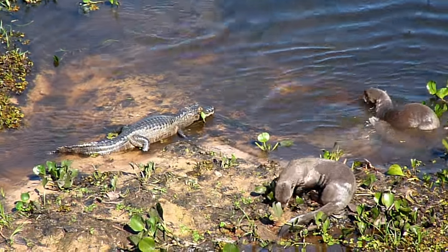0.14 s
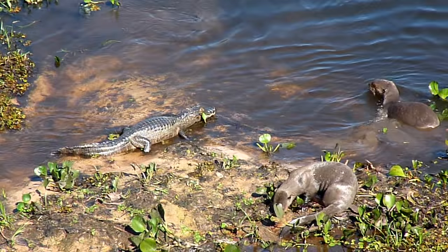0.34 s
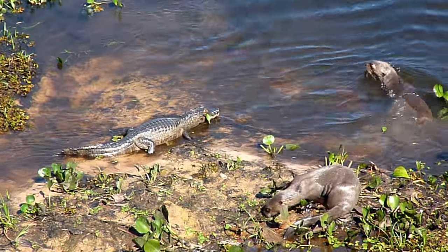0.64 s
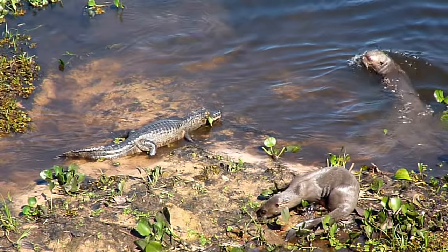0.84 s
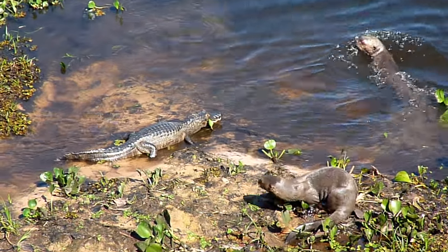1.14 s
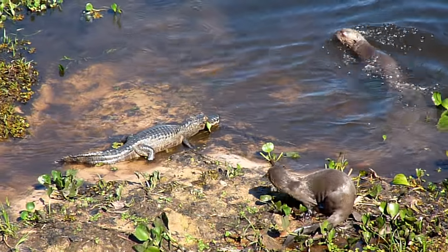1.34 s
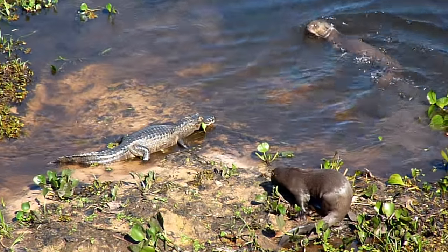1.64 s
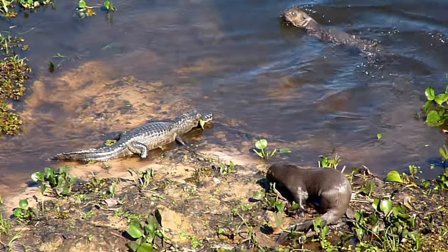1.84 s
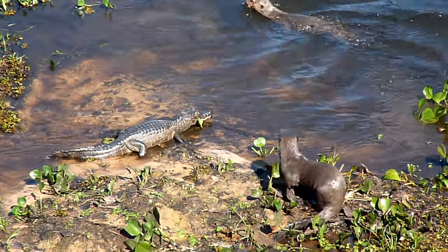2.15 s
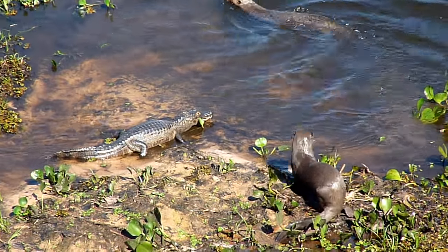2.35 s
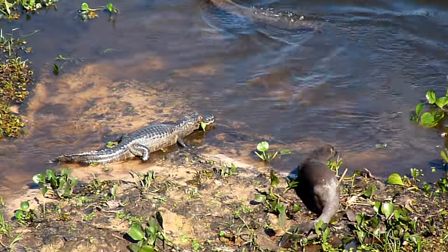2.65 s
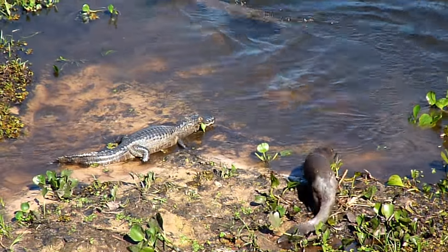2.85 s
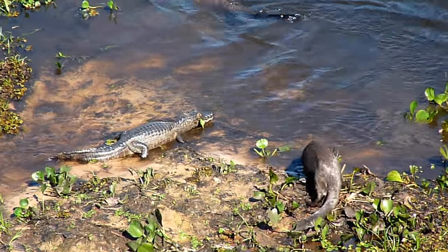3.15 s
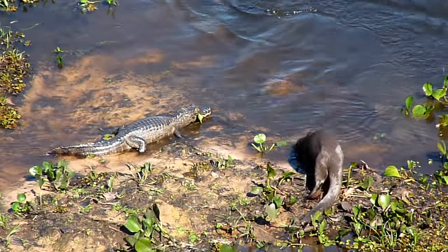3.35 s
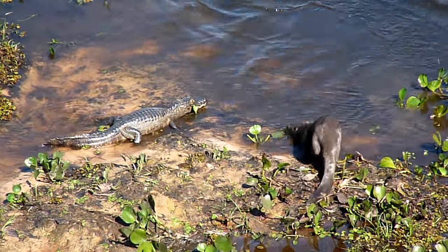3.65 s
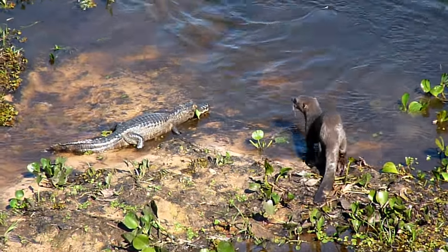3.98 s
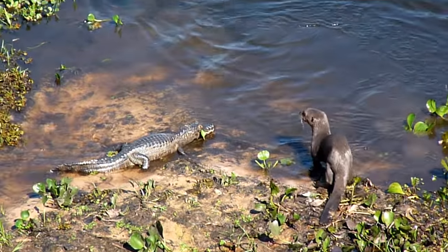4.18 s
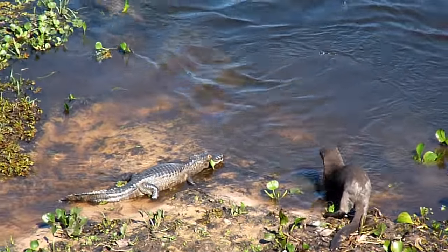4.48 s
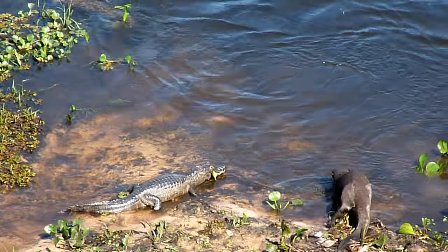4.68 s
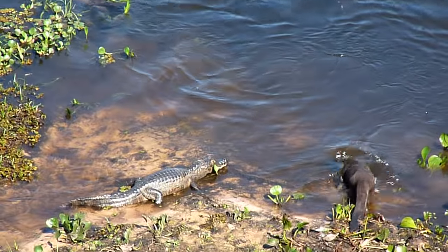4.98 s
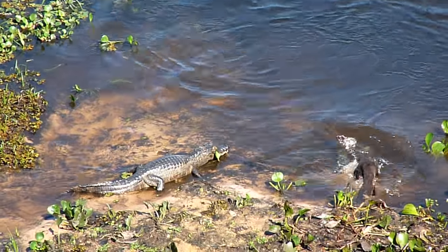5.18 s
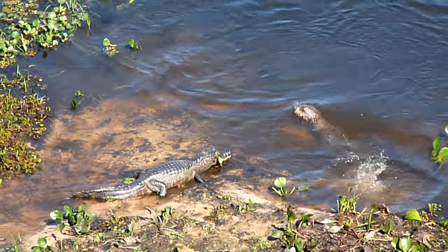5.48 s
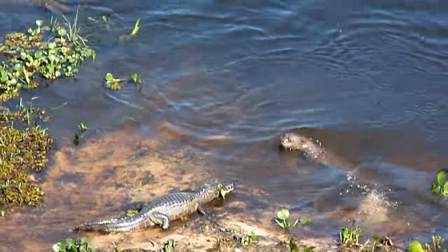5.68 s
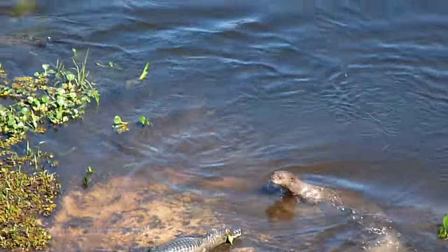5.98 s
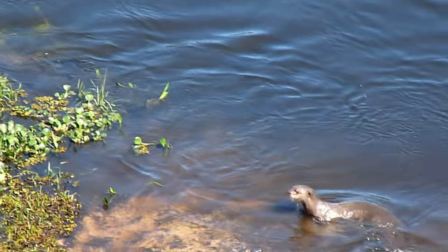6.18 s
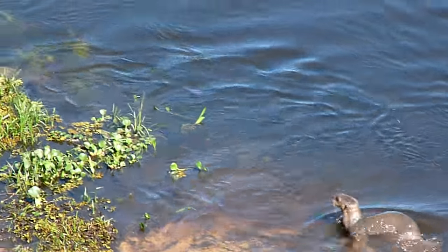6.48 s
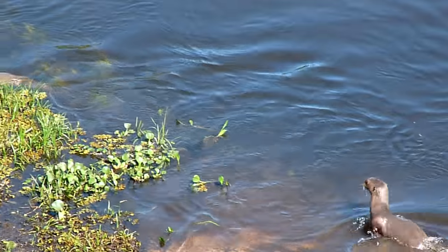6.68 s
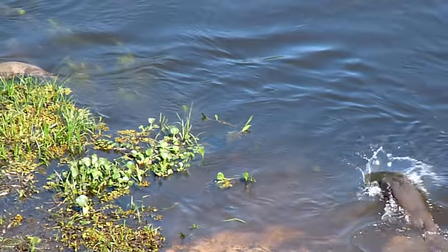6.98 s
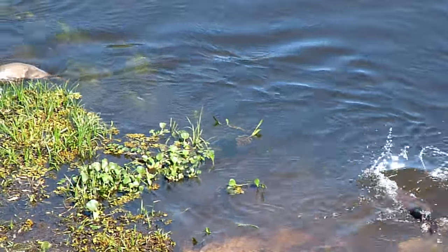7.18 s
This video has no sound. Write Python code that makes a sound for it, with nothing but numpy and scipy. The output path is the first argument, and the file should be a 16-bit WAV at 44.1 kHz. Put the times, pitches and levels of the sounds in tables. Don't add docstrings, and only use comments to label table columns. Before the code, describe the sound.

An open riverbank heard through a small camera microphone with faint hiss. From 0 to 2 seconds it is fairly quiet: a distant, wavering machine hum, soft lapping and scattered bubble plops, with a tiny falling bird whistle near 1.4. Wind freshens around 2.1, bumping the microphone with low thuds; more plops and a faint whistle come near 2.7. At about 3.0 to 3.5, rapid, hoarse, low trilled animal calls begin, probably an otter. Further bursts follow at 3.7 to 3.9, a clearer long run at 4.1 to 4.3, and the loudest at 4.5 to 4.7. A thin stepped falling whistle comes near 4.9, with plops from 5.0 to 5.3. Another raspy trill sounds at 5.3 to 5.5, a higher one around 6.1, and a short scrap at 6.4. Trees echo the calls softly. Wind builds from 5.7, rumbling and thumping heavily until 7.3, with closer plops and light splashing around 7.

```python
import sys
import numpy as np
from scipy import signal
from scipy.fft import rfft, irfft, next_fast_len
from scipy.io import wavfile
from scipy.ndimage import uniform_filter1d, map_coordinates

SR = 44100
rng = np.random.default_rng(int(sys.argv[2]) if len(sys.argv) > 2 else 0)


def rack_gain(trim_db):
    fader = np.asarray(trim_db, float)
    return 10 ** (fader / 20)


def bounce(signal):
    frames = np.transpose(np.atleast_2d(signal))
    limited = np.clip(frames, -1, 1)
    pcm = np.round(limited * 32767).astype(np.int16)
    wavfile.write(sys.argv[1], SR, pcm)


N = 323025

# centre in Hz, width in Hz, level in dB.
DRONE_PIPES = [(215, 35, -15), (307.3, 17, -3), (470.6, 49, -10), (546.9, 50, 0), (1090, 130, -21)]
# middle in s, half width in s, change in dB.
DRONE_SURGES = [(.1, 0.16, 4.5), (.76, 0.045, -1.5), (.94, 0.028, 7), (1.35, 0.15, 5.5), (1.93, 0.084, 2.5),
                (2.13, 0.044, -7), (2.2, 0.012, 8.5), (2.28, 0.028, -4), (3.9, 0.22, 5), (4.31, 0.025, 11),
                (4.62, 0.042, 4.5), (4.81, 0.042, 7.5), (5.11, .05, 7.5), (5.25, 0.017, 12),
                (6.08, 0.032, 6.5), (6.4, 0.32, 7.5), (7.18, 0.15, 5.5), (7.26, 0.023, -14)]

# time in s, level in dB.
BREEZE_LEVEL = [
    (0.0, -66),
    (0.5, -58.5),
    (1.6, -57.5),
    (2.2, -50.5),
    (4.2, -56.5),
    (5.3, -48.5),
    (7.32, -47.5),
]
# start in s, length in s, level in dB, upper part in dB relative to the level.
GUST_EVENTS = [(1.704, .05, -58.5, 9), (2.094, 0.045, -44, -19), (2.376, 0.088, -39, -10.5),
               (2.5, 0.18, -36, -4), (2.778, 0.25, -46, -3), (3.313, 0.35, -40.5, -12.5),
               (3.757, 0.12, -43, -21), (4.284, 0.16, -45, -17), (4.496, 0.22, -45.5, -9),
               (4.909, 0.065, -40, -9.5), (5.09, 0.043, -43.5, -20), (5.352, 0.334, -42, -15),
               (5.75, 0.2, -34.5, -2), (6.064, 0.16, -35, -8.5), (6.36, 0.25, -33.5, -13.5),
               (6.686, .22, -38.5, -6), (6.947, 0.26, -34, -18)]
# time in s, peak in dB, frequency in Hz.
EDDY_THUMPS = [(1.706, -38.5, 72.4), (2.15, -26, 137), (2.387, -46, 84), (2.589, -26, 110),
               (3.345, -60, 119), (3.754, -25.5, 76), (4.446, -34, 110), (5.098, -30, 119.8),
               (5.381, -35, 97.5), (5.747, -32, 121), (5.857, -27, 70), (6.211, -26.5, 110),
               (6.388, -18.5, 89), (6.451, -27, 138.5), (6.606, -20.5, 72.6), (6.703, -21.5, 85),
               (6.823, -25.5, 111), (7.001, -21.5, 102), (7.054, -21, 103), (7.189, -22.5, 62.6)]
# frequency in Hz, density in dB per Hz.
BUFFET_SPECTRUM = [(12, -40), (20, -1.5), (48, -0.5), (97, 1), (198, -3), (420, -24.5), (550, -34),
                   (920, -120)]
# frequency in Hz, density in dB per Hz.
FLUTTER_SPECTRUM = [(120, -36), (200, -14), (280, 1), (450, -7), (700, -17), (1200, -49.5)]

# time in s, level in dB.
WATER_LEVEL = [(0.0, -63), (2.18, -63.5), (2.63, -60.5), (3.3, -61), (3.44, -63.5), (4.96, -64),
               (5.08, -60), (5.3, -63), (6.8, -60), (7.1, -60), (7.32, -60.5)]
# time in s, peak in dB, frequency in Hz, ring length in cycles.
PLOP_BUBBLES = [(0.308, -41, 1610, 18), (.325, -41, 1380, 9.6), (0.593, -47, 2180, 14),
                (1.155, -44, 1090, 6.6), (1.186, -50.5, 1800, 8), (1.209, -43.5, 1090, 7.4),
                (1.249, -38, 2230, 2), (1.389, -46.5, 1570, 21), (1.465, -41, 1410, 5),
                (1.572, -42, 2160, 8.8), (2.54, -44.5, 2020, 31), (2.625, -41.5, 2150, 3.5),
                (2.754, -41.5, 2500, 4.6), (2.786, -42, 990, 14), (3.978, -44, 2050, 12),
                (3.995, -46.5, 1740, 16), (5.019, -39, 1510, 4.7), (5.079, -39, 1594, 23),
                (5.103, -41, 1170, 5.9), (5.122, -42, 1460, 20), (5.231, -42.5, 1400, 9.3),
                (5.263, -44, 2200, 11), (6.539, -38, 1278, 20), (6.904, -55, 2270, 10),
                (6.936, -42.5, 1480, 15), (6.992, -42, 1450, 9), (7.011, -47, 1700, 6.7),
                (7.078, -34, 1540, 4.1), (7.13, -40.5, 1470, 7.7), (7.196, -37, 1720, 8.1)]
# frequency in Hz, density in dB per Hz.
LAPPING_SPECTRUM = [(150, -4.5), (300, 4), (600, -4.5), (900, -1.5), (1600, -8.5), (2400, -11.5),
                    (4000, -31)]
# frequency in Hz, density in dB per Hz.
SPRAY_SPECTRUM = [(500, -12.5), (900, 1), (1700, -1.5), (2500, -15), (3500, -28)]

# time in s, pitch in Hz, level in dB.
WHISTLE_CALLS = [
    [(1.378, 2930, -72), (1.405, 2800, -67), (1.43, 2560, -63), (1.45, 2330, -70)],
    [(2.67, 3270, -72), (2.72, 3330, -68.5), (2.76, 3200, -69), (2.782, 2980, -71), (2.797, 2750, -86),
     (2.818, 2500, -63), (2.835, 2300, -76)],
    [(3.125, 3120, -74), (3.155, 3250, -65), (3.213, 3170, -65)],
    [(4.84, 3260, -67), (4.88, 3240, -61), (4.915, 3170, -64), (4.927, 3050, -80), (4.942, 2870, -68),
     (4.96, 2650, -82), (4.985, 2450, -69), (5.012, 2340, -71)],
]

# frequency in Hz, gain in dB.
THROAT_GAIN = [(700, -7), (1100, -10.5), (1600, -4.5), (2100, 1.5), (3300, -3), (4500, -14), (5000, -16.5),
               (5800, -27)]
# frequency in Hz, density in dB per Hz.
BREATH_SPECTRUM = [(800, -15.5), (1300, 1), (2000, -2), (2800, 4), (3600, -17), (4700, -14.5),
                   (5800, -30.5)]
# middle in s, length in ms, pitch in Hz, level in dB, opening chirp in dB.
SINGLE_NOTES = [(3.258, 13, 845, -58, -5), (3.289, 20, 936, -47.5, -9), (3.678, 22, 863, -53, -6.5),
                (3.71, 20, 967, -47.5, -14), (4.088, 19, 903, -51.5, -15), (4.12, 20, 1003, -50, -12),
                (4.524, 14, 949.3, -47, -10), (5.295, 18, 946, -49, -9), (5.325, 18, 980, -47.5, -5),
                (5.343, 13, 999, -49, -11), (5.36, 15, 1048, -50, -14), (5.521, 13, 995, -57, -2.5),
                (6.066, 28, 952, -54.5, -17), (6.097, 19, 1051, -50.5, -17), (6.427, 16, 867, -51.5, -12),
                (6.439, 13, 888, -50, -5), (6.456, 15, 1122, -56.5, 1.5), (6.469, 10, 1072, -54, -4)]
# first note in s, last note in s, pitch in Hz, level in dB, hoarseness in dB.
NOTE_RUNS = [
    (3.025, 3.099, 1075, -58, 11.5),
    (3.115, 3.193, 890, -53, 13),
    (3.318, 3.465, 1061, -50.5, 9.5),
    (3.736, 3.782, 1073, -46, 0),
    (3.803, 3.886, 1007, -50, 5),
    (4.15, 4.279, 1102, -46.5, 0),
    (4.551, 4.624, 1127, -44, -0.5),
    (4.645, 4.728, 1136, -48, 6),
    (5.383, 5.501, 1064, -48, 4),
    (6.122, 6.256, 1185, -48, 2.5),
]
# time in s, length in ms, share of pitch, level in dB, third overtone in dB, chirp in dB.
NOTE_SPREAD = [.0012, 2, .02, 1.5, 2, 2.5]

# frequency in Hz, T60 in s.
BANK_T60 = [(800, 0.23), (2500, 0.42), (5000, 0.45)]
# frequency in Hz, gain in dB.
MIKE_GAIN = [(6000, -1.5), (7500, -13.5), (9000, -24)]
# frequency in Hz, density in dB per Hz.
HISS_SPECTRUM = [(20, 8.5), (100, -2.5), (400, -1.5), (1500, -10.5), (2500, -10.5), (4500, -11.5),
                 (6700, -14), (7800, -21), (8800, -29.5), (9300, -36), (9900, -42.5), (15500, -45)]
# frequency in Hz, level in dB.
CIRCUIT_WHINE = [(6665, -88.5), (9335, -112)]


def unit(x):
    return x / np.sqrt(np.mean(x ** 2) + 1e-20)


def along(points, hz):
    f, v = np.transpose(points)
    return np.interp(np.log(hz + 1), np.log(f + 1), v)


def curves(rows, t):
    s, *cols = np.transpose(rows)
    return [np.interp(t, s, c) for c in cols]


def wobble(rate_hz):
    return map_coordinates(rng.standard_normal(400), [np.arange(N) * rate_hz / SR])


def noise(response):
    m = next_fast_len(N)
    spectrum = rfft(rng.standard_normal(m)) * response(np.fft.rfftfreq(m, 1 / SR))
    return unit(irfft(spectrum, m)[:N])


def shaped_noise(spectrum_db):
    return noise(lambda f: rack_gain(along(spectrum_db, f)))


def add(track, s, sound):
    part = track[round(s * SR):][:len(sound)]
    part += sound[:len(part)]


def drone():
    t = np.arange(N) / SR
    level_db = -56 + 1.26 + 1.5 * wobble(22)
    for s, half_width_s, db in DRONE_SURGES:
        level_db = level_db + db * np.exp(-((t - s) / half_width_s) ** 2)

    def pipes(f):
        return sum(rack_gain(db) / (1 + (2 * (f - hz) / width_hz) ** 2) for hz, width_hz, db in DRONE_PIPES)

    return rack_gain(level_db) * noise(pipes)


def gusts():
    rise_s, fall_s, breeze_upper_db = 0.031, 0.051, 6
    t = np.arange(N) / SR
    low = rack_gain(curves(BREEZE_LEVEL, t)[0])
    upper = low * rack_gain(breeze_upper_db)
    for s, length_s, db, upper_db in GUST_EVENTS:
        before = np.maximum(s - t, 0) / rise_s
        after = np.maximum(t - s - length_s, 0) / fall_s
        shape = np.exp(-before ** 2 - after ** 2)
        low = low + rack_gain(db) * shape
        upper = upper + rack_gain(db + upper_db) * shape
    return low, upper


def wind():
    low_strength, upper_strength = gusts()
    lumps_db = 1.78 * wobble(14) + 1.4 * wobble(30)
    low = unit(rack_gain(lumps_db) * shaped_noise(BUFFET_SPECTRUM))
    upper = unit(rack_gain(1.2 * lumps_db) * shaped_noise(FLUTTER_SPECTRUM))
    thumps = np.zeros(N)
    for s, db, hz in EDDY_THUMPS:
        cycles = np.arange(3000) / SR * hz
        push = np.exp(-(2.2 * (cycles - 1)) ** 2) * np.cos(2 * np.pi * cycles)
        add(thumps, s - 1 / hz, rack_gain(db) * push)
    return rack_gain(-2.5) * low_strength * low + rack_gain(-9.5) * upper_strength * upper + thumps


def bubble(hz, cycles, rise=0.14):
    u = np.arange(1500) / SR * hz / cycles
    envelope = (1 - np.exp(-u / .15)) * np.exp(-2.5 * u)
    return envelope * np.sin(2 * np.pi * cycles * u * (1 + rise * u / 2))


def water():
    level_db, = curves(WATER_LEVEL, np.arange(N) / SR)
    plops, ripples, splash = np.zeros((3, N))
    for s, db, hz, cycles in PLOP_BUBBLES:
        add(plops, s, rack_gain(db - 1.5) * bubble(hz, cycles))
        add(splash, s - .015, rack_gain(db - 22.0) * np.hanning(2600))
    for when, high, size in rng.uniform(size=(900, 3)):
        add(ripples, when * N / SR, rack_gain(6.9 * size) * bubble(600 * 3.5 ** high, 7.1))
    swell_db = 1.2 * wobble(6)
    rush = rack_gain(level_db + 2.5 + swell_db) * shaped_noise(LAPPING_SPECTRUM)
    spray = splash * shaped_noise(SPRAY_SPECTRUM)
    return plops + spray + rush + rack_gain(level_db - 7) * unit(ripples)


def whistles():
    voice = np.zeros(N)
    for rows in WHISTLE_CALLS:
        t = np.arange(rows[0][0], rows[-1][0], 1 / SR)
        hz, db = curves(rows, t)
        tone = np.sin(2 * np.pi * np.cumsum(hz) / SR)
        add(voice, t[0], rack_gain(db + 4.0) * signal.windows.tukey(len(t), .1) * tone)
    return voice


def notes():
    gap_s, hurry = .0215, .1
    note_ms, shorter_ms = 12.5, 2.5
    droop, fade_db, hoarser_db, brighter_db = 0.027, 3.5, 5, 3
    dull_from_db, dulling = 6, 2.5
    third_db, clear_chirp_db, hardest_db = -0.5, -13, -1.5
    rows = [(*row, third_db, chirp_db) for *row, chirp_db in SINGLE_NOTES]
    for first_s, last_s, hz, db, hoarse_db in NOTE_RUNS:
        span_s = last_s - first_s
        places = np.linspace(0, 1, round(span_s / gap_s) + 1)
        spread = rng.standard_normal((10, 6)) * NOTE_SPREAD
        dull_db = dulling * max(hoarse_db - dull_from_db, 0)
        for u, (ds, dms, dhz, ddb, dthird, dchirp) in zip(places, spread):
            middle_s = first_s + span_s * (u + hurry * u * (1 - u)) + ds
            length_ms = note_ms - shorter_ms * u + dms
            pitch_hz = hz * (1 - droop * u + dhz)
            level_db = db - fade_db * u ** 2 + ddb
            overtone_db = third_db + brighter_db * u - dull_db + dthird
            chirp_db = min(clear_chirp_db + hoarse_db + hoarser_db * u + dchirp, hardest_db)
            rows.append((middle_s, length_ms, pitch_hz, level_db, overtone_db, chirp_db))
    return sorted(rows)


def trills():
    lead_s, rasp, fourth_db, hoarse_db = .005, 0.39, -8, 1.5
    drop_in, sag, snap_up, first_rise = 0.807, .18, .33, .04
    flutter, unsteady = 0.017, 6.3
    voice, breath, last_s = np.zeros(N), np.zeros(N), 0
    for s, ms, hz, db, third_db, chirp_db in notes():
        hold_s = ms * 1.2 / 1000
        t = np.arange(-lead_s, hold_s, 1 / SR)
        u = np.clip(t / hold_s, 0, 1)
        early = np.clip(-t / lead_s, 0, 1)
        airflow, tension = uniform_filter1d(rng.standard_normal((2, 2500)), size=30)[:, :len(t)] * 2.26

        if s - last_s > .05:
            bend = first_rise * (u - .5) + .3 * snap_up * u ** 8
        else:
            bend = sag * (1 - u) ** 9 + snap_up * u ** 8
        shake = flutter * (1 + unsteady * rack_gain(chirp_db)) * tension
        pitch = hz * (1 + drop_in * early + bend + shake)
        phase = 2 * np.pi * np.cumsum(pitch) / SR + rng.uniform(0, 2 * np.pi)

        harmonics_db = [6 * early, -3 * early, third_db - 9 * early, fourth_db - 9 * early]
        tone = np.zeros(len(t))
        for k, harmonic_db in enumerate(harmonics_db, 1):
            tone += rack_gain(harmonic_db + along(THROAT_GAIN, k * pitch)) * np.sin(k * phase)
        opening = np.interp(t, [-lead_s, -.7 * lead_s, -.2 * lead_s, .002],
                            [0, rack_gain(chirp_db - 13.5), rack_gain(chirp_db + 7.5), 1])
        valve = (1 + rasp * airflow) * opening * (1 - u ** 9)
        add(voice, s - .45 * hold_s - lead_s, rack_gain(db) * valve * tone)
        add(breath, s - hold_s / 2 - lead_s, rack_gain(db + chirp_db + hoarse_db) * np.hanning(900))
        last_s = s
    return voice + breath * shaped_noise(BREATH_SPECTRUM)


def bank(x):
    out, step = np.zeros(N), SR // 20
    for start in range(SR, N, step):
        hz, t, z = signal.stft(rng.standard_normal(SR // 3), SR, nperseg=256)
        decay = rack_gain(-60 * t / along(BANK_T60, hz)[:, None])
        tail = signal.istft(z * decay, SR, nperseg=256)[1]
        tail *= 1 - np.exp(-np.arange(len(tail)) / SR / .03)
        tail /= np.linalg.norm(tail)
        add(out, start / SR, signal.fftconvolve(x[start:start + step], tail))
    return out


def scene():
    background = drone() + wind() + water()
    far = whistles()
    calls = rack_gain(0.5) * trills()
    echoes = rack_gain(-4.5) * bank(calls + 0.37 * far)
    return (background + far + calls + echoes)[None]


def top_cut(x):
    return signal.sosfilt(signal.butter(12, 15720, fs=SR, output="sos"), x)


def record(dry):
    t = np.arange(N) / SR
    response = rack_gain(along(MIKE_GAIN, np.fft.rfftfreq(2 * N, 1 / SR)))
    heard = irfft(rfft(dry, 2 * N) * response)[:, :N]
    whine = sum(rack_gain(db + 2.0) * np.sin(2 * np.pi * hz * t) for hz, db in CIRCUIT_WHINE)
    hiss = rack_gain(-64.5) * shaped_noise(HISS_SPECTRUM)
    return top_cut(heard + hiss + whine)


dry = scene()
out = record(dry)
bounce(out)
```